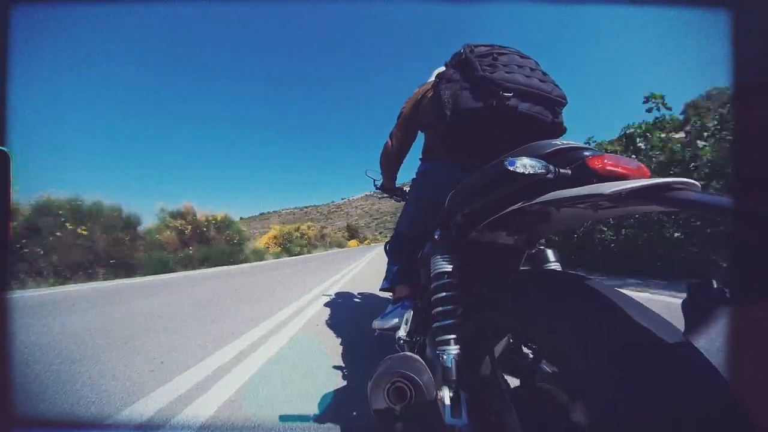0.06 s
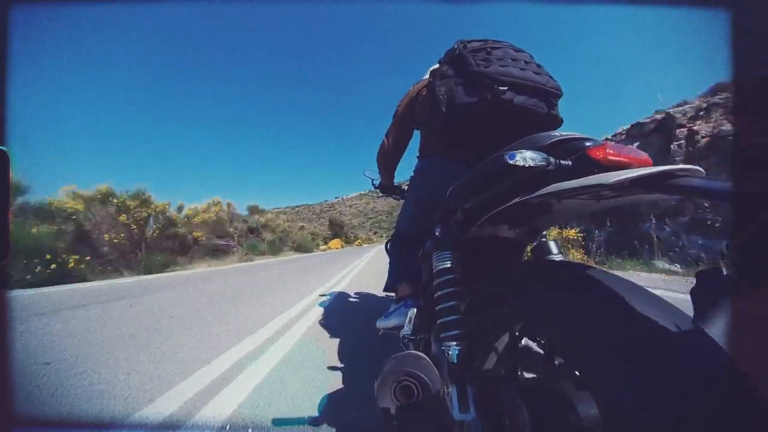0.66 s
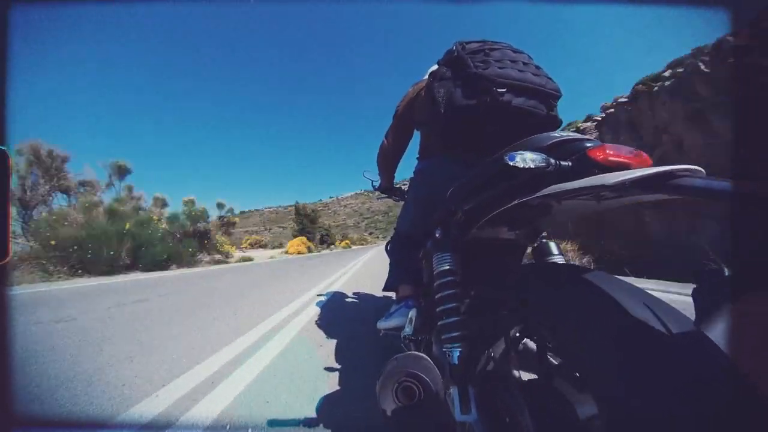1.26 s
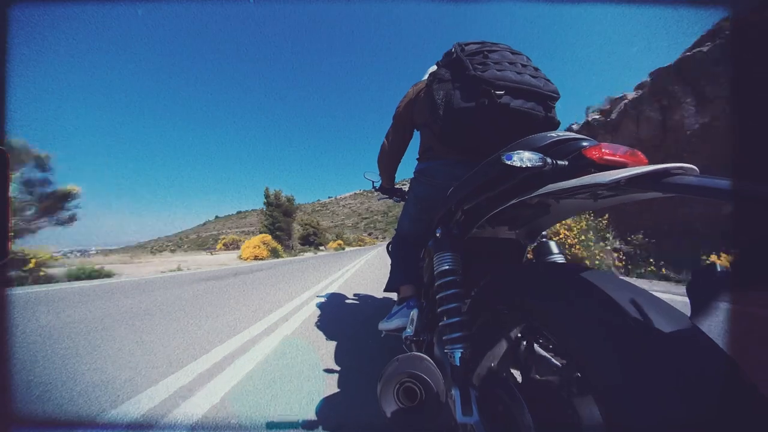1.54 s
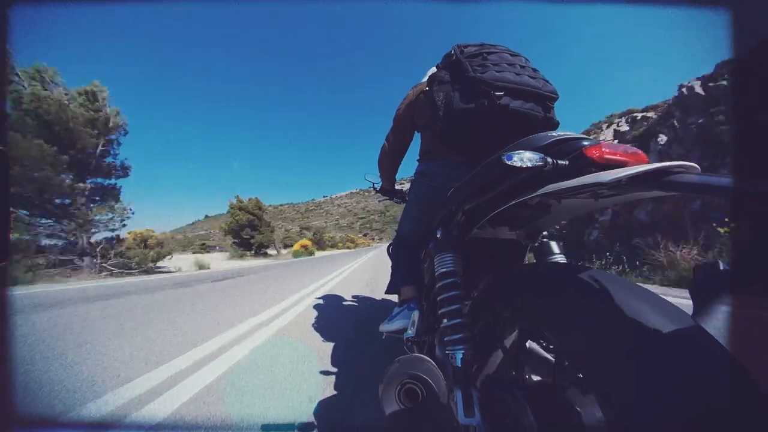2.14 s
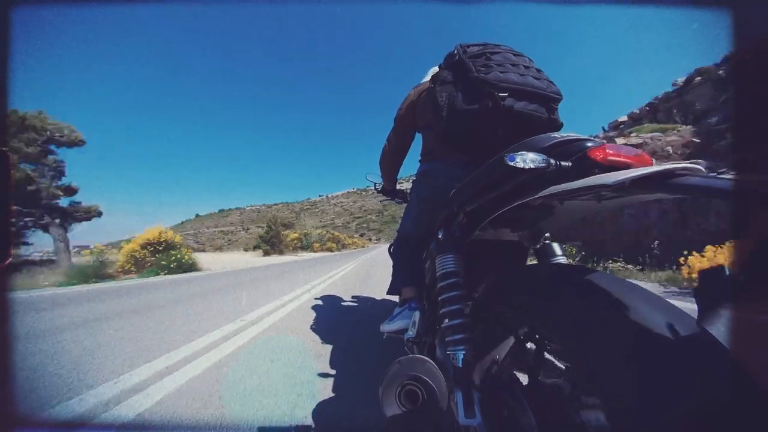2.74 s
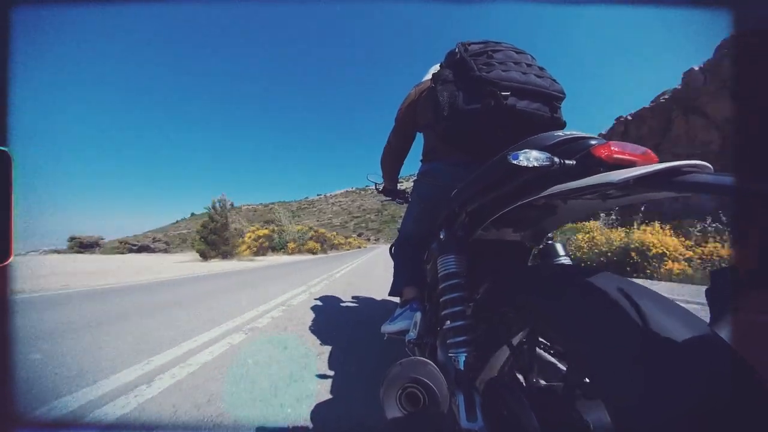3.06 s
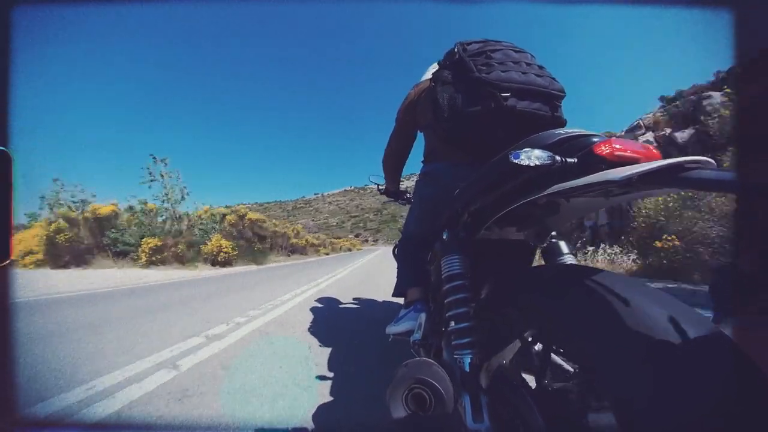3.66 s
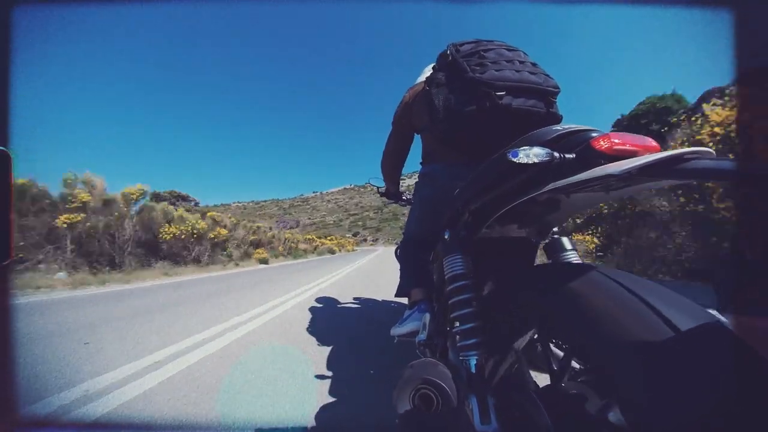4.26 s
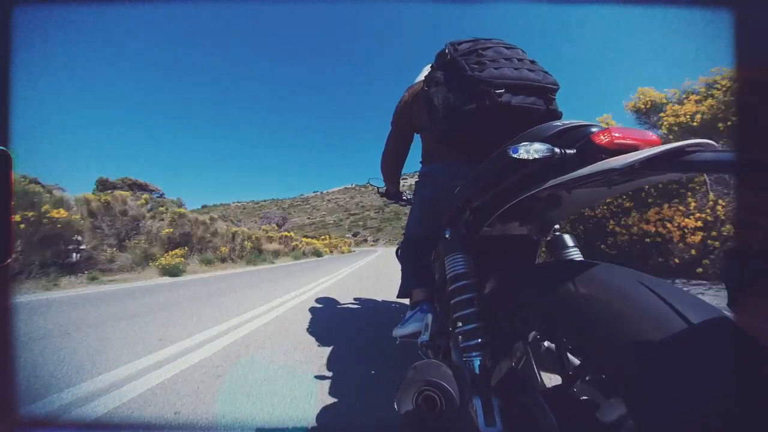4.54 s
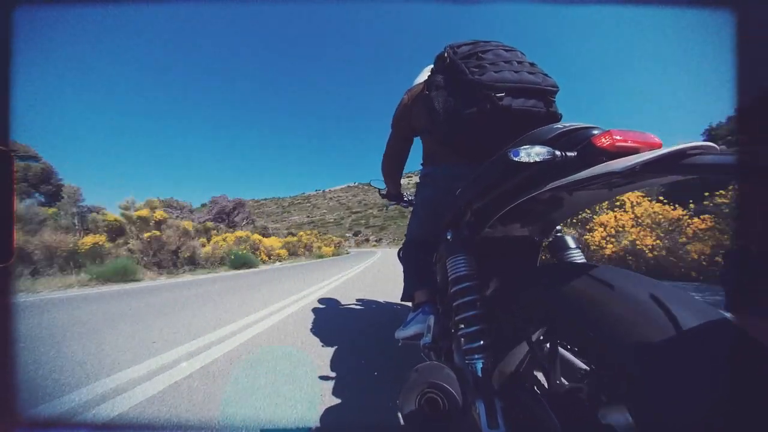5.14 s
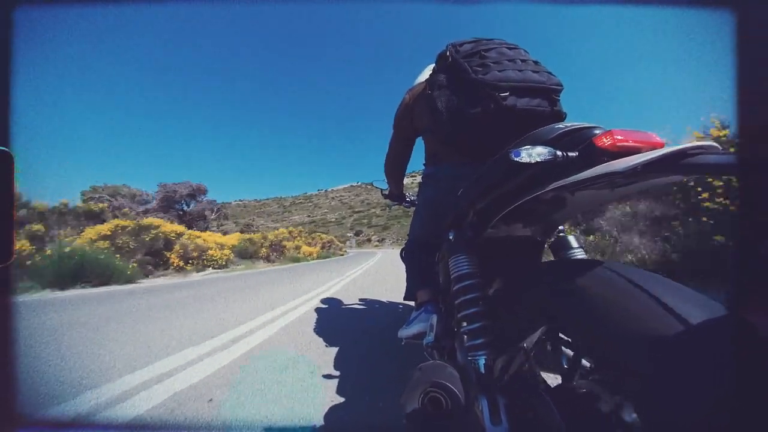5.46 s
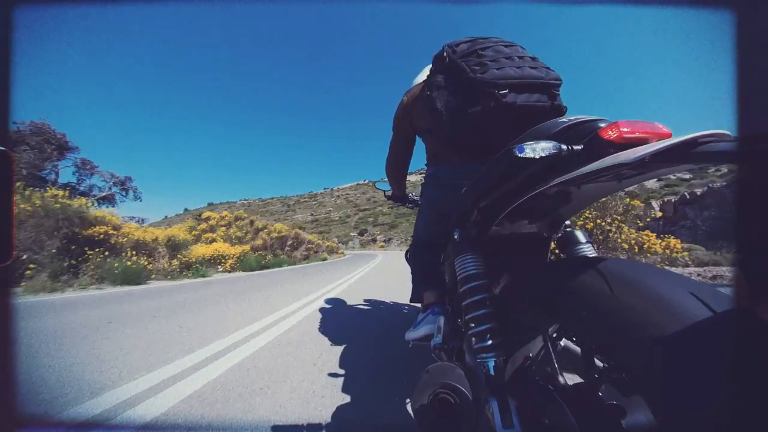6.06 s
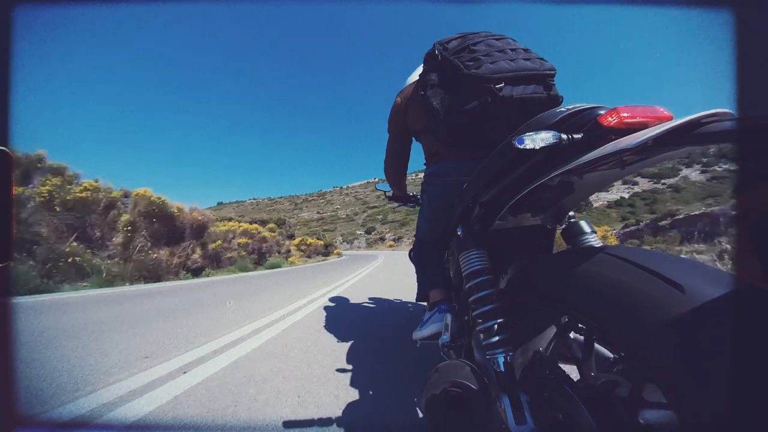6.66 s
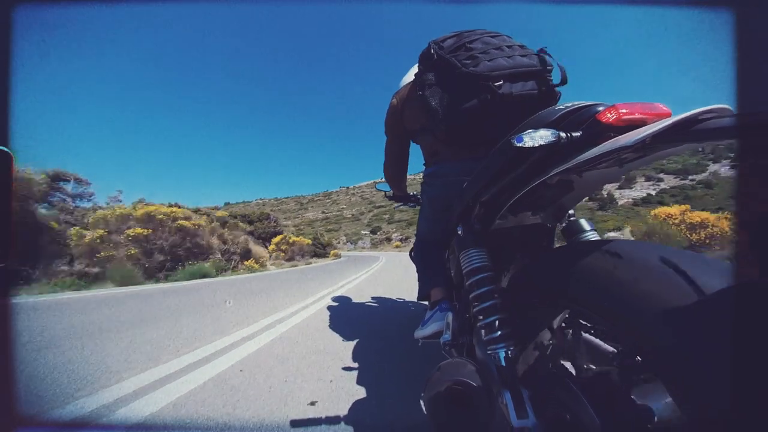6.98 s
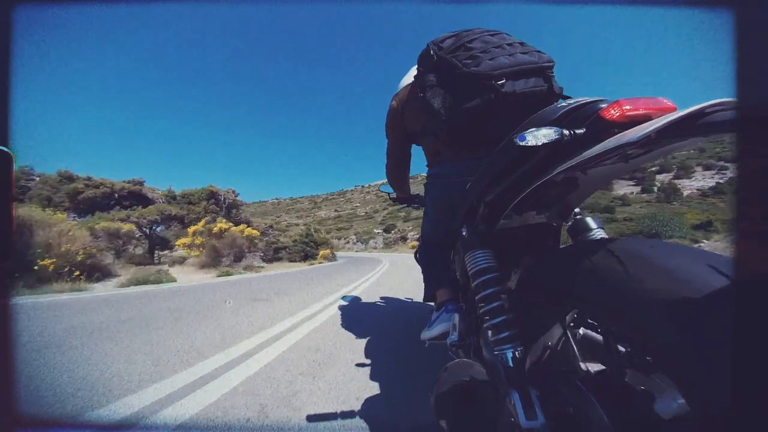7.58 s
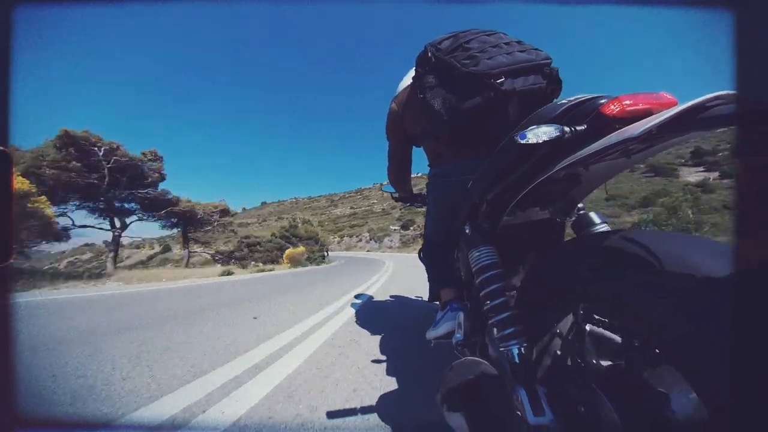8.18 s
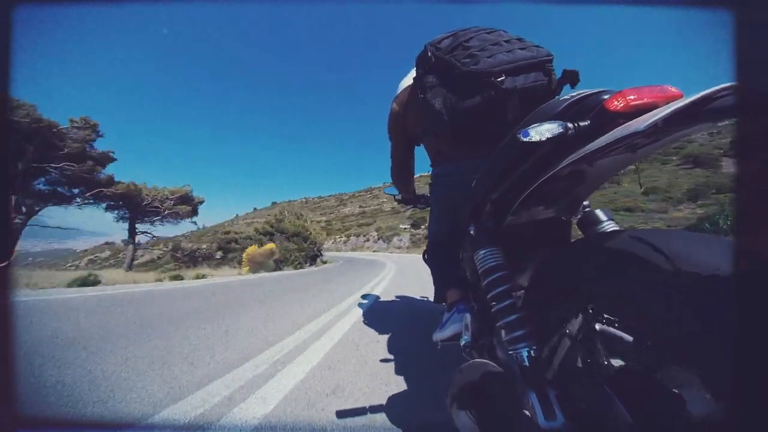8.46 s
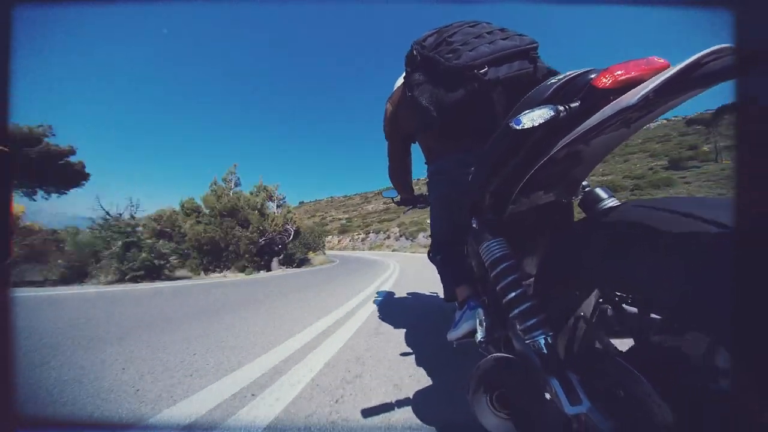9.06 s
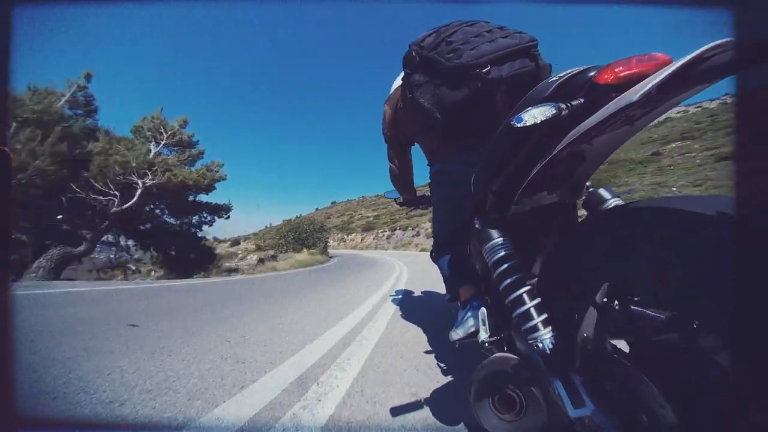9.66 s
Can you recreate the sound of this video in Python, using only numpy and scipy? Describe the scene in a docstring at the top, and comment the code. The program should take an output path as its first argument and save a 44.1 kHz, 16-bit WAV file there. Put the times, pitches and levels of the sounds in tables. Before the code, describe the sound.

A twin-cylinder motorcycle rides along a mountain road, heard close beside its silencer. It pulls briefly with a deep beat and a faint metallic buzz, then the throttle shuts. The exhaust pops and burbles irregularly while the revs slowly sink, until the engine picks up again at the very end. Exhaust rasp and hiss, ticking valves, faint gear whine and light wind rumble run behind it.

```python
"""The deep beat of a V-twin motorcycle pulling along a mountain road, close up, from a microphone
mounted beside its silencer. The throttle soon shuts: late burns pop and burble in the pipe while
the revs sink, and at the very end the engine picks up again. Gas rasps and hisses with each exhaust
stroke. Behind it the valve gear ticks, the gears whine faintly, loose metal buzzes during the first
pull, and wind rumbles around the microphone."""
import sys
import numpy as np
from scipy import signal
from scipy.fft import rfft, irfft, next_fast_len
from scipy.io import wavfile
from scipy.ndimage import uniform_filter1d, map_coordinates

SR = 44100
rng = np.random.default_rng(int(sys.argv[2]) if len(sys.argv) > 2 else 0)


def persist_wave(psi):
    """Save psi, clipped to +-1, as 16-bit WAV."""
    counts = np.round(np.clip(psi, -1, 1) * 32767).astype(np.int16)
    wavfile.write(sys.argv[1], SR, np.atleast_2d(counts).T)


N = 437472

# engine speed in four-stroke cycles: time_s, speed_hz
ENGINE_SPEED = [(0.0, 26.836), (0.3, 27.38), (0.6, 27.15), (1.3, 27.131), (2.3, 26.445), (2.8, 25.885),
                (4.5, 23.497), (5.0, 22.986), (6.2, 22.796), (6.6, 22.528), (7.5, 20.357), (8.0, 18.78),
                (8.4, 17.92), (8.9, 17.661), (9.5, 17.637), (9.92, 18.46)]
# throttle, from 0 (shut) to 1 (wide open): time_s, opening
THROTTLE_OPENING = [(0, 0.4), (.3, 0.28), (.58, 0.23), (.68, 0), (.9, 0), (9.55, 0), (9.575, 0.37),
                    (9.92, 0.37)]
# wind around the microphone: frequency_hz, density_db
WIND_SPECTRUM = [(15, -48), (50, -63), (150, 10), (280, 5.5), (450, -25), (1000, -61)]
# gear whines: teeth_per_cycle, start_s, end_s, level_db
GEAR_WHINES = [(32, 2.4, 3.6, -52), (32, 6.7, 7.7, -53), (72, 7.6, 9.92, -58), (64, 8.4, 9.6, -56),
               (100, 4.8, 8.5, -55), (100, 9.55, 10.1, -58)]
# loose metal buzzing under load: centre_s, level_db
RATTLE_SWELLS = [(0.04, -41), (.18, -41), (.395, -41)]
# colour of that buzz: frequency_hz, density_db
RATTLE_SPECTRUM = [(2500, -32.5), (3700, 0), (5000, 3), (6300, 2), (9000, -16)]
# ringing steel parts: pitch_hz, width_hz, gain_db
STEEL_MODES = [(3810, 55, -3.5), (4360, 190, -6), (4970, 20, 6), (6570, 94, 6), (6775, 31, 4.5),
               (7110, 220, -1), (9080, 240, 0.5)]
# gas hiss, also the colour of the valve ticks: frequency_hz, density_db
HISS_SPECTRUM = [(1200, -30), (1650, -8), (1900, -0.5), (2300, -3.5), (2750, -4.5), (3000, -7.5),
                 (3400, -2), (4750, -5), (5050, -1.5), (6600, -1.5), (9000, -5.5), (10400, -17.5),
                 (11000, -16), (12600, -24.5), (14500, -16)]
# gas rasp in the pipe: frequency_hz, density_db
RASP_SPECTRUM = [(250, 7), (400, -5.5), (500, -2.5), (580, -9.5), (690, 0), (755, 3.5), (820, -4.5),
                 (950, -4.5), (1110, -5), (1230, -18), (1310, -4.5), (1420, -5.5), (1600, -21.5),
                 (2200, -47)]
# the pipe's ring under load: frequency_hz, density_db
PIPE_SPECTRUM = [(600, -39), (720, 8), (760, 10), (800, -6), (950, -37)]
# loud pops of late burns on the overrun: time_s, relative_size_db
LOUD_POPS = [(0.6825, -13.3), (0.7955, -13.8), (1.1752, -13.6), (1.3099, -13.5), (1.434, -13.6),
             (1.6066, -11.8), (1.9557, -14.3), (2.1674, -14.7), (2.1813, -13.5), (2.7002, -14.4),
             (2.9843, -13.0), (3.181, -14.2), (4.056, -13.6), (4.1966, -15.2), (4.4757, -13.3),
             (4.662, -15.2), (4.9207, -12.5), (5.7051, -14.0), (6.3026, -14.2), (6.8544, -15.0),
             (7.2263, -12.7), (7.648, -15.5), (7.7693, -13.9), (7.9573, -15.5), (7.9765, -15.9),
             (8.1188, -14.8), (8.3592, -15.2), (8.5245, -11.5), (8.6156, -13.6), (8.6935, -11.4),
             (8.8631, -10.4), (9.0322, -14.9), (9.1251, -12.8), (9.2039, -12.6), (9.372, -16.9),
             (9.5417, -10.2)]
# pressure wave of one piston stroke: frequency_hz, gain_db
STROKE_SPECTRUM = [(12, -55), (24, -24), (36, -14), (46, -1), (55, 7.5), (80, 10.5), (100, -5), (130, 8.5),
                   (160, -5.5), (185, -5), (210, -6.5), (270, -11), (370, -31.5), (550, -43), (1200, -74)]

# Level laws: shut_throttle_cruise_db, per_octave_of_revs_db, full_throttle_adds_db
CLATTER_LEVEL = (-41.5, 2.4, 1)  # valve gear
HISS_LEVEL = (-43, 4.4, 1)  # gas hiss
RASP_LEVEL = (-37, 6.9, 6.3)  # gas rasp
PUSH_LEVEL = (-3, -4, -11.5)  # piston's push
EDGE_GAIN = (0, 80, 12)  # upper band of that push
CRUISE_HZ = 25  # engine cycles a second


def amp(db):
    """Decibels to gain."""
    return 10 ** (np.asarray(db) / 20)


def unit(x):
    """x at rms 1."""
    return x / np.sqrt(np.mean(x ** 2) + 1e-20)


def curve(rows):
    """One value per sample from (time_s, value) rows."""
    return np.interp(np.arange(N) / SR, *np.transpose(rows))


def at(values, times):
    """A per-sample curve read at the given times."""
    return np.interp(times * SR, np.arange(N), values)


def wobble(rate_hz):
    """A smooth random curve with rate_hz knots a second."""
    knots = rng.standard_normal(int(N * rate_hz / SR) + 4)
    return map_coordinates(knots, [np.arange(N) * rate_hz / SR])


def filtered(x, response):
    """x times a complex response of frequency."""
    padded = next_fast_len(N + SR // 2)
    return irfft(rfft(x, padded) * response(np.fft.rfftfreq(padded, 1 / SR)), padded)[:N]


def coloured(x, spectrum):
    """x through a spectrum read on a log frequency axis."""
    knots_hz, db = np.transpose(spectrum)
    return filtered(x, lambda hz: amp(np.interp(np.log(hz + 1), np.log(knots_hz), db)))


def resonance(hz, pitch_hz, width_hz):
    """Response of one damped mode, 1 at its pitch."""
    return 1j * hz * width_hz / (pitch_hz ** 2 - hz ** 2 + 1j * hz * width_hz)


def pulses(times, sizes):
    """Impulses; size 1 has the area of one millisecond at full scale."""
    where = np.clip(np.round(times * SR).astype(int), 0, N)
    return np.bincount(where, sizes * SR / 1000, N + 1)[:N]


def law_db(law, speed, throttle):
    """Level of a layer from the revs and the throttle."""
    cruise_db, octave_db, load_db = law
    return cruise_db + octave_db * np.log2(speed / CRUISE_HZ) + load_db * throttle


def wind(level_db, gust_db):
    """Air rumbles unevenly around the microphone."""
    return amp(level_db + gust_db * wobble(7)) * unit(coloured(rng.standard_normal(N), WIND_SPECTRUM))


def gear_whine(cycle, waver_db, smear_rad):
    """Meshing teeth sing at a pitch that follows the revs; each tone swells and fades."""
    t, whine = np.arange(N) / SR, np.zeros(N)
    for teeth, start_s, end_s, db in GEAR_WHINES:
        progress = np.clip((t - start_s) / (end_s - start_s), 0, 1)
        swell = np.sqrt(np.abs(np.sin(np.pi * progress)))
        gain = amp(db + waver_db * wobble(17))
        whine += swell * gain * np.sin(2 * np.pi * teeth * cycle + smear_rad * wobble(40))
    return whine


def rattles(width_s):
    """Loose metal buzzes in short swells."""
    t = np.arange(N) / SR
    swells = sum(amp(db) * np.exp(-((t - centre_s) / width_s) ** 2) for centre_s, db in RATTLE_SWELLS)
    return swells * unit(coloured(rng.standard_normal(N), RATTLE_SPECTRUM))


def valve_clatter(cycle, per_cycle, scatter_db, jitter_s, decay_s):
    """Valve gear and chain tick unevenly with the shaft and set the steel parts ringing."""
    times = np.interp(np.arange(int(cycle[-1] * per_cycle)) / per_cycle, cycle, np.arange(N) / SR)
    size, slip = rng.standard_normal((len(times), 2)).T
    hits = pulses(times + jitter_s * slip, amp(scatter_db * np.minimum(size, 2)))
    envelope = signal.lfilter([1], [1, -np.exp(-1 / (decay_s * SR))], hits)
    ticks = unit(coloured(envelope * rng.standard_normal(N), HISS_SPECTRUM))
    steel = lambda hz: sum(amp(db) * resonance(hz, pitch, width) for pitch, width, db in STEEL_MODES)
    return amp(-10.5) * ticks + amp(-8) * unit(filtered(ticks, steel))


def puffs(train, width_s):
    """Gas flow: a soft swell around each impulse, of mean 1."""
    swell = np.abs(filtered(train, lambda hz: np.exp(-np.minimum(hz * width_s, 10) ** 2)))
    return swell / swell.mean()


def gas_rush(flow, spectrum, depth):
    """Turbulent noise whose power rises with the gas flow, at an even long-term level."""
    power = 1 + depth * flow
    power = power / uniform_filter1d(power, size=SR // 4)
    return unit(coloured(np.sqrt(power) * rng.standard_normal(N), spectrum))


def stroke_times(cycle, first_phase):
    """The cylinders stand at a right angle, so their strokes come 3/8 and 5/8 of a cycle apart."""
    marks = (np.arange(int(cycle[-1]) + 1)[:, None] + first_phase + [0, 3 / 8]).ravel()
    return np.interp(marks[marks < cycle[-1]], cycle, np.arange(N) / SR)


def late_burns(strokes, throttle, chance, burble_db, spread_db):
    """Off the throttle only some charges catch, late. Times and sizes, with the loudest pop at 1."""
    pop_s, pop_db = np.transpose(LOUD_POPS)
    luck, size = rng.random(len(strokes)), rng.standard_normal(len(strokes))
    clear_of_pops = np.abs(strokes[:, None] - pop_s).min(axis=1) > .01
    caught = clear_of_pops & (luck < chance) & (at(throttle, strokes) < .2)
    times = np.append(pop_s, strokes[caught] - .002)  # a burn leaves the valve just before the push
    size_db = np.append(pop_db, burble_db + spread_db * size[caught])
    return times, amp(size_db - pop_db.max())


def afterburns(burns, gain_db, exponent):
    """Late burns pop in the pipe; a high exponent favours the biggest."""
    times, sizes = burns
    return pulses(times, amp(gain_db) * sizes ** exponent)


def firings(strokes, speed, throttle, lead_cycles, gain_db, second_cylinder_db, scatter_db):
    """Under load, burnt gas bursts out as the valve opens, ahead of the push; one cylinder is louder."""
    cylinder = np.arange(len(strokes)) % 2
    size_db = gain_db + second_cylinder_db * cylinder + scatter_db * rng.standard_normal(len(strokes))
    return pulses(strokes - lead_cycles / at(speed, strokes), at(throttle, strokes) * amp(size_db))


def silencer(bursts, soft_hz, body_hz, width_hz, outlet_hz):
    """The silencer rounds each burst and rings at one pitch; its small outlet radiates no deep bass."""
    rounding = lambda hz: 1 / np.cosh(np.minimum(hz / soft_hz, 20))
    outlet = lambda hz: 1j * hz / (outlet_hz + 1j * hz)
    return filtered(bursts, lambda hz: resonance(hz, body_hz, width_hz) * rounding(hz) * outlet(hz))


def gas_left(strokes, burns, reach_s, share):
    """Share of its push that a stroke keeps: a late burn has already blown part of the gas out."""
    times, sizes = burns
    near = np.abs(strokes[:, None] - times) < reach_s
    return 1 - np.clip(share * (near @ sizes), 0, .9)


def piston_beat(strokes, burns, speed, throttle, scatter_db, jitter_s, edge_hz, max_edge_db):
    """Each stroke draws gas back, pushes it out and draws again; faster strokes have a harder edge."""
    size, slip = rng.standard_normal((len(strokes), 2)).T
    pushes = amp(at(law_db(PUSH_LEVEL, speed, throttle), strokes) + scatter_db * size)
    pushes *= gas_left(strokes, burns, reach_s=.005, share=.39)
    wave = coloured(pulses(strokes + jitter_s * slip, pushes), STROKE_SPECTRUM)
    bass = filtered(wave, lambda hz: 1 / (1 + (hz / edge_hz) ** 6))
    edge_db = np.minimum(law_db(EDGE_GAIN, speed, throttle), max_edge_db)
    return bass + (wave - bass) * amp(edge_db)


def scene():
    """Beside the silencer: one crankshaft drives the exhaust beat, its gas noise and the machinery."""
    speed, throttle = curve(ENGINE_SPEED), curve(THROTTLE_OPENING)
    cycle = np.cumsum(speed) / SR
    strokes = stroke_times(cycle, first_phase=.64)
    burns = late_burns(strokes, throttle, chance=.17, burble_db=-18.5, spread_db=1.5)
    beat = piston_beat(strokes, burns, speed, throttle,
                       scatter_db=.54, jitter_s=.00008, edge_hz=260, max_edge_db=12.5)
    fired = firings(strokes, speed, throttle,
                    lead_cycles=.15, gain_db=11, second_cylinder_db=2.5, scatter_db=1.2)
    bark = silencer(fired, soft_hz=155, body_hz=141, width_hz=93, outlet_hz=24.8)
    popped = afterburns(burns, gain_db=15.5, exponent=.96)
    burble = silencer(popped, soft_hz=95.2, body_hz=146, width_hz=196, outlet_hz=34)
    # at low revs the biggest burns steepen into a harder crack
    steepened = afterburns(burns, gain_db=2, exponent=1.6) * (speed.min() / speed) ** 2
    crack = silencer(steepened, soft_hz=285, body_hz=178, width_hz=22, outlet_hz=44.5)

    flow = puffs(pulses(strokes - .0012, np.ones(len(strokes))), width_s=.0065)
    blast = puffs(fired + popped, width_s=.0014)
    rasp = gas_rush(flow + .25 * blast, RASP_SPECTRUM, depth=.19)
    rasp *= amp(law_db(RASP_LEVEL, speed, throttle))
    pipe_ring = amp(-45.5) * throttle * gas_rush(flow, PIPE_SPECTRUM, depth=.19)
    flutter_db = .7 * wobble(16) + .35 * wobble(45)  # the treble flutters
    hiss = gas_rush(flow, HISS_SPECTRUM, depth=.23)
    hiss *= amp(law_db(HISS_LEVEL, speed, throttle) + flutter_db)

    clatter = valve_clatter(cycle, per_cycle=8, scatter_db=4, jitter_s=.0007, decay_s=.0035)
    clatter *= amp(law_db(CLATTER_LEVEL, speed, throttle) + flutter_db)
    air = wind(level_db=-35, gust_db=2)
    machinery = gear_whine(cycle, waver_db=2.5, smear_rad=.6) + rattles(width_s=.025) + clatter
    return air + machinery + hiss + pipe_ring + rasp + crack + burble + bark + beat


def record(dry):
    """The microphone keeps nothing above its band limit."""
    return filtered(dry, lambda hz: hz < 15750)


dry = scene()
out = record(dry)
persist_wave(out)
```